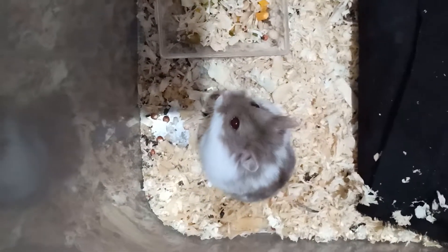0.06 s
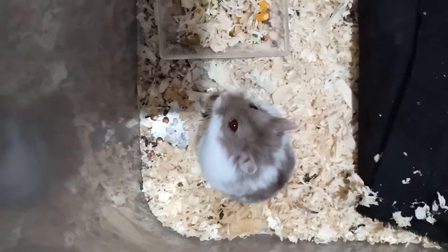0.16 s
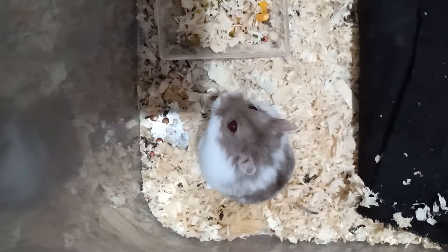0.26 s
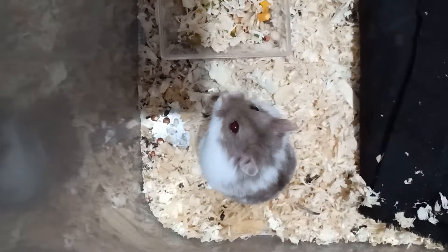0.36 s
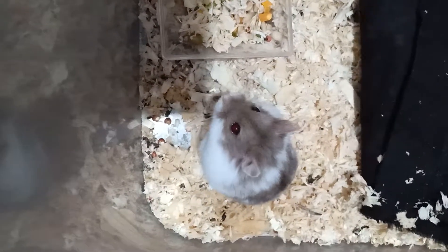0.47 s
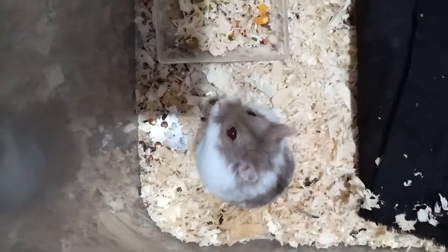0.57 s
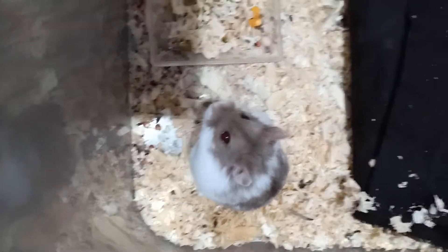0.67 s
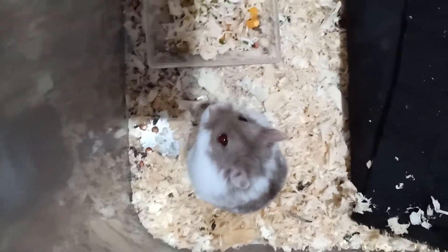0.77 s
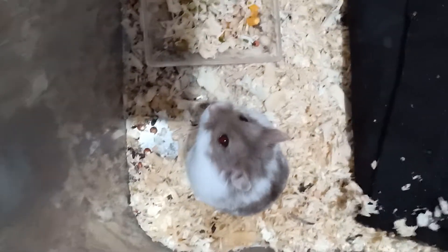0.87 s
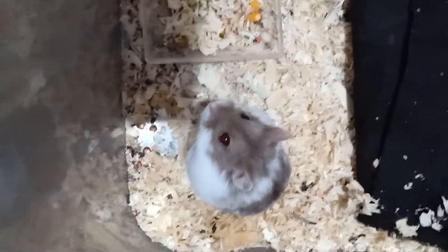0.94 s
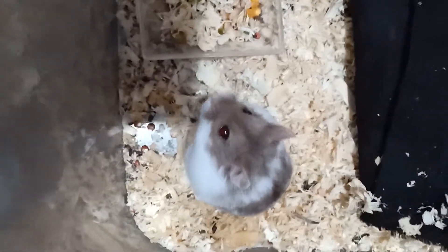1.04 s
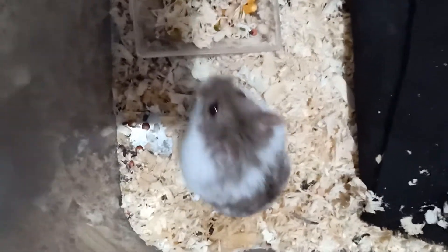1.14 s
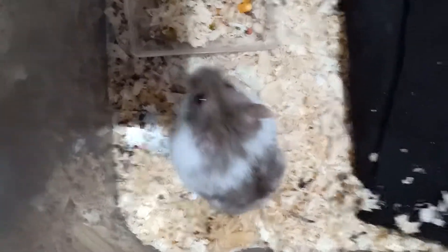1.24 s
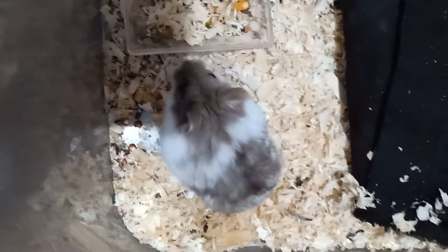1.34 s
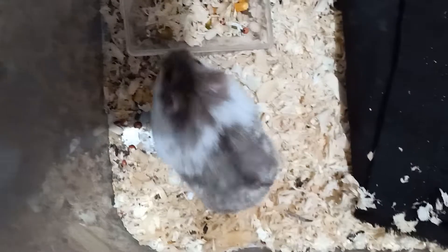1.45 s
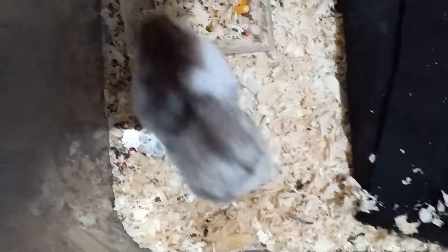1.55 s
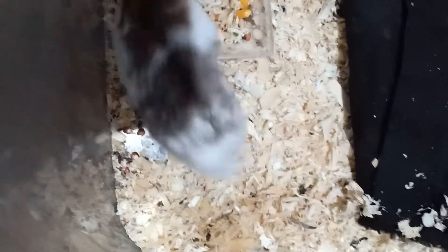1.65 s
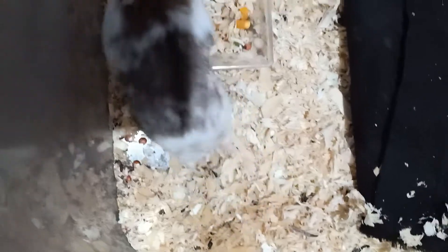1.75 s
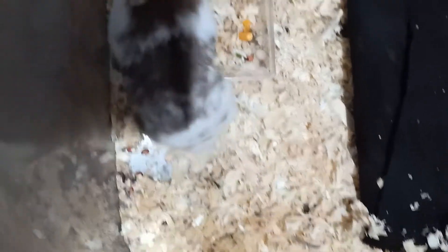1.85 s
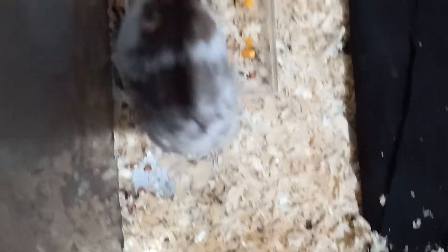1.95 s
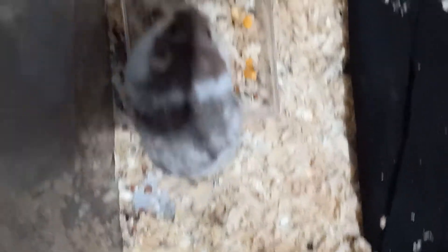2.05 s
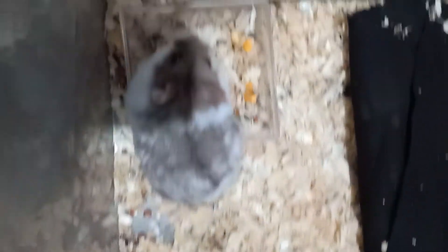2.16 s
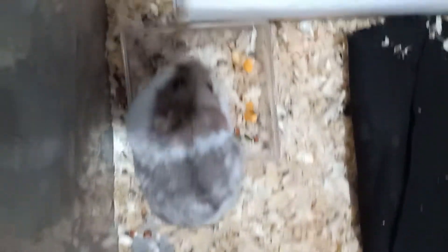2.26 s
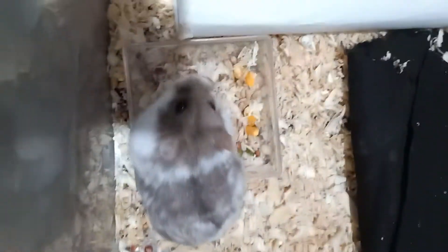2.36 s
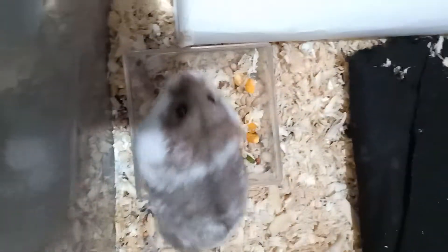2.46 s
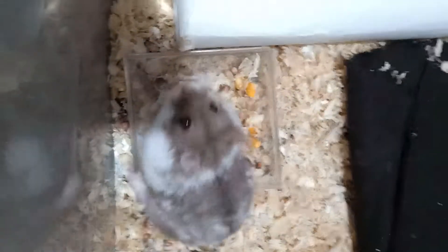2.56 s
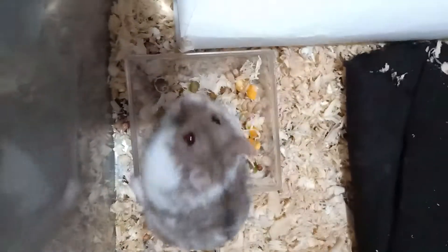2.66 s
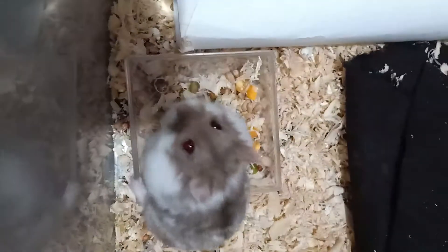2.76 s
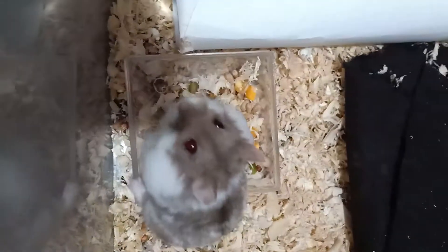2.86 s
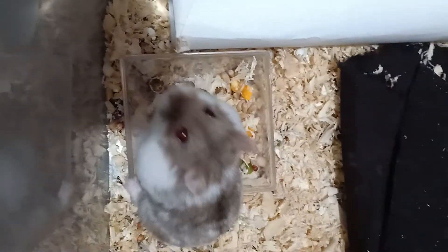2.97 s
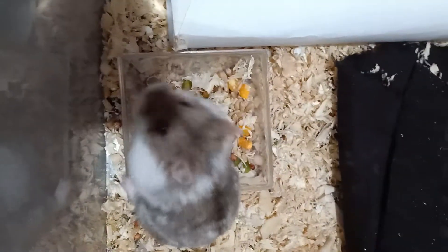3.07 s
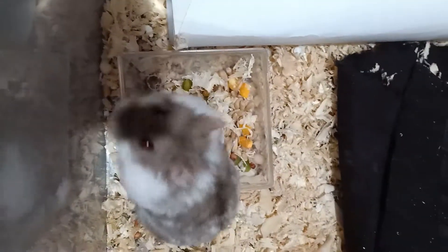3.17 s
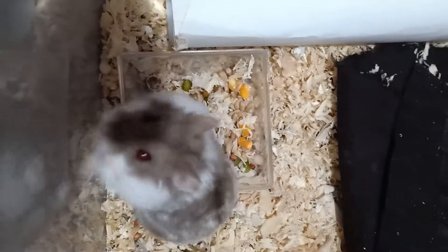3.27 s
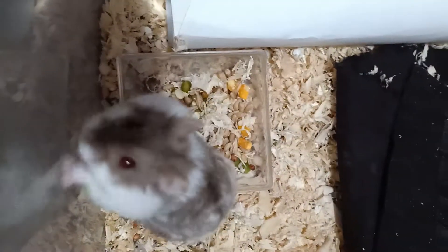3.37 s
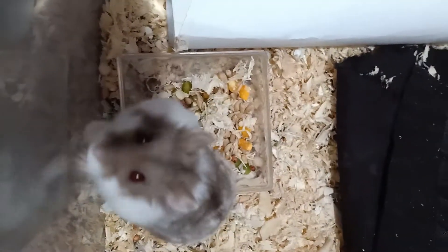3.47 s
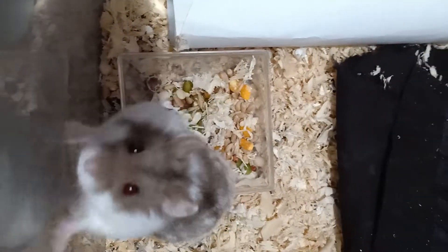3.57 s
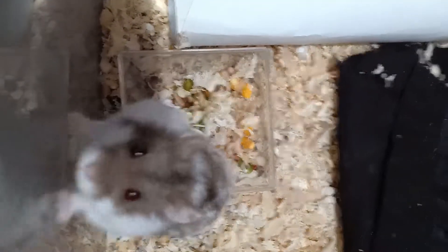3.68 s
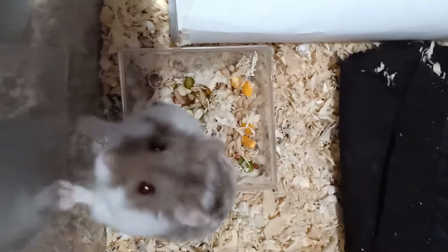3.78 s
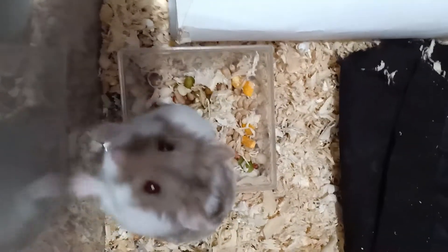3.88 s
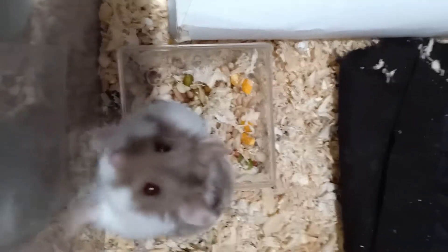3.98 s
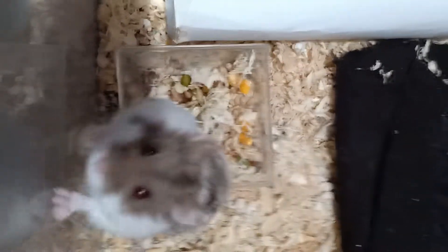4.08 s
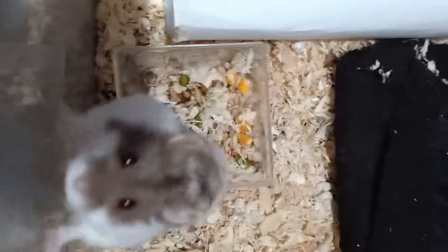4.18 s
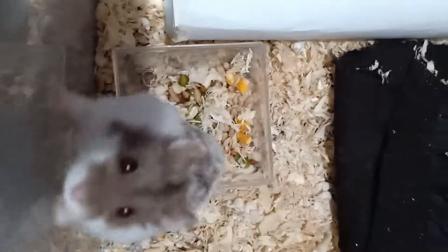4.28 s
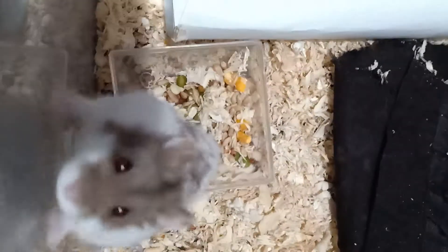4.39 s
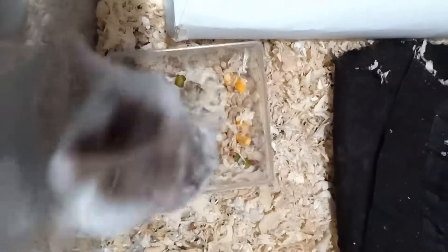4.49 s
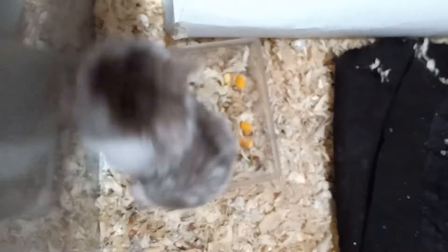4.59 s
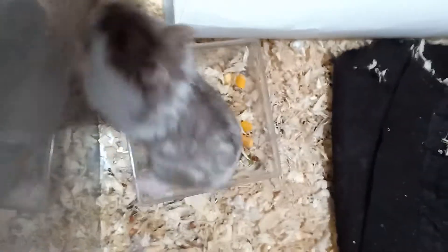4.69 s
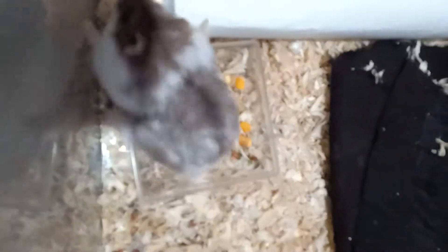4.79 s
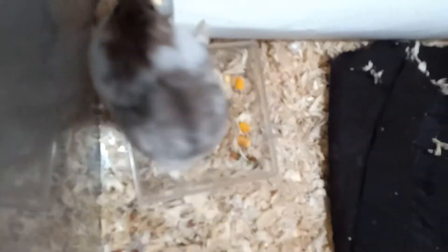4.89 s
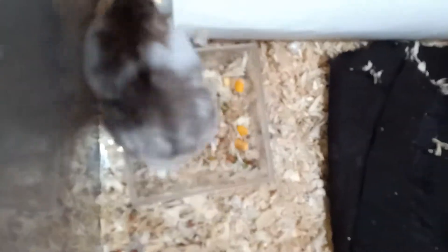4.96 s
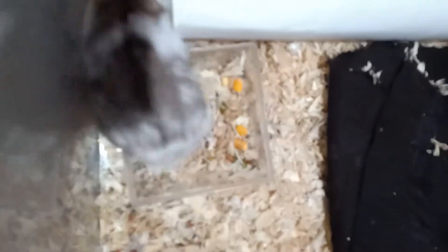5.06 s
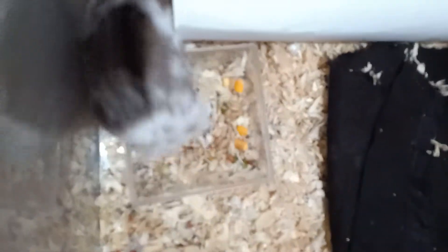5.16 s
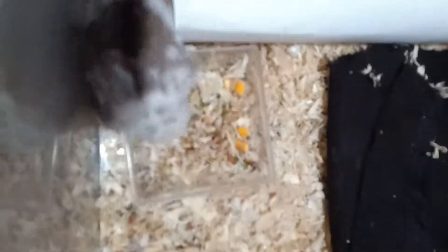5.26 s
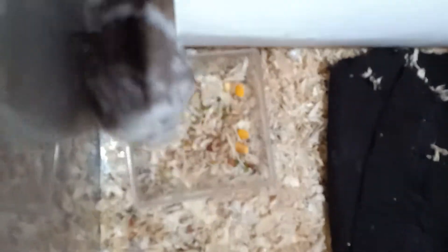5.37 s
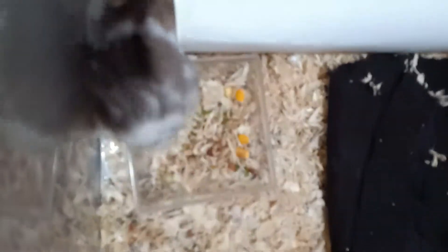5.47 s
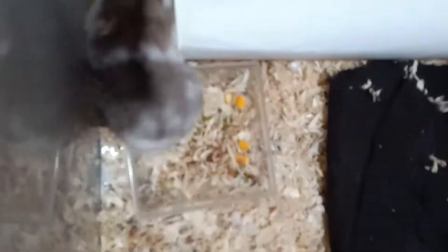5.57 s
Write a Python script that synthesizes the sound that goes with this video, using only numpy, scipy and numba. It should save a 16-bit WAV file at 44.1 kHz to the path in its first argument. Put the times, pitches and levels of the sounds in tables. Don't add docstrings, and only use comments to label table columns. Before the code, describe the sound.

Near silence with faint room hiss, then claws tick thick wood chips and a paw taps the tub wall. Thin shavings snap and rustle in little scattered clusters, with soft pats on a plastic dish and low bumps of shifting weight. Late on, one hard scratchy clack jumps out, then a few smaller rustles and knocks. Close, dry, indoors, leaning right.

```python
import sys
import numpy as np
from scipy import signal
from scipy.io import wavfile
from scipy.ndimage import uniform_filter1d
from numba import njit

SR = 44100
rng = np.random.default_rng(int(sys.argv[2]) if len(sys.argv) > 2 else 0)


def volts(x):
    e = np.asarray(x, float) / 20
    return 10 ** e


def file_out(sig):
    cols = np.atleast_2d(sig).T
    lim = np.clip(cols, -1, 1)
    pcm = np.round(lim * 32767).astype(np.int16)
    wavfile.write(sys.argv[1], SR, pcm)


N = 248283


def level(x, db):
    return x * volts(db) / np.sqrt(np.mean(x ** 2))


def curve(rows):
    s, *columns = np.transpose(rows)
    return [np.interp(np.arange(N) / SR, s, column) for column in columns]


@njit
def svf(x, hz, width):
    y, band, low = np.empty(len(x)), 0., 0.
    g, k = np.tan(np.pi * hz / SR), width / hz
    for i in range(len(x)):
        v = (band + g * (x[i] - low)) / (1 + g * (g + k))
        band, low, y[i] = 2 * v - band, low + 2 * g * v, k * v
    return y


def ring(x, modes, wide=None):
    def body(v):
        out = 0
        for k, (hz, width, db) in enumerate(modes):
            mode = svf(v, 1. * hz, 1. * width)
            if wide:
                mode = svf(mode, 1. * hz, wide * width)
            out = out + (-1) ** k * volts(db) * mode
        return out
    tick = np.zeros(8192)
    tick[0] = 1
    return body(x) / np.sqrt(np.sum(body(tick) ** 2))


def walk(rate_hz):
    hold = int(SR / rate_hz)
    steps = np.repeat(rng.standard_normal(N // hold + 1), hold)
    return 1.488 * uniform_filter1d(uniform_filter1d(steps, hold), hold)[:N]


def bursts(times, dbs, t60s, rise):
    out, t = np.zeros(N + 4096), np.arange(4096) / SR
    for s, db, t60 in np.broadcast(times, dbs, t60s):
        start = int(s * SR)
        out[start:start + 4096] += volts(db - 60 * t / t60) * np.minimum(t / rise + 0.248, 1)
    return out[:N]


def strokes(times, lengths, dbs, sharp):
    out = np.zeros(N)
    for s, length, db in zip(times, lengths, dbs):
        n = int(1.445 * length * SR)
        start = max(int((s + length / 2) * SR) - n // 2, 0)
        out[start:start + n] += volts(db) * np.hanning(n) ** sharp
    return out


def clicks(times, dbs):
    out = np.zeros(N)
    np.add.at(out, (np.asarray(times) * SR).astype(int), volts(np.asarray(dbs)))
    return out


def grit(share, spread_db):
    size = volts(spread_db * rng.exponential(size=N))
    return level(rng.standard_normal(N) * size * (rng.random(N) < share), 0)


def even(x, span_s):
    return x / np.sqrt(uniform_filter1d(x ** 2, int(span_s * SR)) + 1e-9)


def shavings(drive):
    # (centre [Hz], width [Hz], level [dB])
    dull_modes = [(1515, 1240, 0)]
    body_modes = [(2280, 420, 6.5), (2900, 800, -9.5)]
    mid_modes = [(3736.6, 480, 0)]
    crisp_modes = [(5054.4, 970, 5.5), (6003, 2940, -8.0), (8100, 900, -19.5), (4560, 654, 0.5)]
    air_modes = [(9470, 3700, -5.5), (11796, 2680, -5.5), (14650, 2800, 0.5)]
    # (dull [dB], body [dB], mid [dB], crisp [dB], air [dB])
    left_dbs = [-9, -19, -8.5, -12.5, -28.5]
    groups = (dull_modes, body_modes, mid_modes, crisp_modes, air_modes)
    parts = [ring(d, modes, wide=1.835) for d, modes in zip(drive, groups)]
    parts[0] = -parts[0]
    left = sum(volts(db) * part for db, part in zip(left_dbs, parts))
    return np.array([far_port(left, t60=0.0287), sum(parts)])


def far_port(x, t60):
    lag_s, places_per_s, direct = .00036, 5.0, 0.4
    t = np.arange(2048) / SR
    chance = rng.standard_normal(2048)
    turn = 2 * np.pi * places_per_s * np.arange(N) / SR
    out = direct * np.roll(x, int(lag_s * SR))
    for share, scatter in ((np.cos(turn), chance), (np.sin(turn), chance[::-1])):
        path = scatter * volts(-60 * t / t60) * (t > lag_s)
        out = out + signal.fftconvolve(share * x, path / np.sqrt(np.sum(path ** 2)))[:N]
    return out


def snaps():
    t60_s = 0.0149
    s, body_db, mid_db, crisp_db, air_db = np.transpose(breaks())
    crack = np.tanh(1.051 * rng.standard_normal(N))
    dbs = (body_db - 7.0, body_db + 3.5, mid_db + 3.0, crisp_db + 3.5, air_db + 3.5)
    single = [crack * bursts(s, db, share * t60_s, rise=.0007)
              for db, share in zip(dbs, (.9, 1.1, 1.05, .95, .8))]
    return np.add(single, flicks(crack))


def breaks():
    # (time [s], level [dB], thinness [dB], fineness [dB])
    thin_rows = [(0.878, -47.5, -6.5, -22), (1.7339, -44, 7, -17.5), (1.9911, -38.5, 1.5, -20),
                 (2.5428, -43, -10, -17.5), (2.9752, -39, 4, -21.5), (3.1737, -39.5, 2, -13.5),
                 (3.2806, -46.5, -0.5, -19.5), (3.3318, -39.5, -4, -5.5), (3.3422, -41.5, -2, -8),
                 (3.387, -45, -3, -11.5), (3.4203, -44.5, -4.5, -19.5), (3.4284, -49, 3.5, -17),
                 (3.5651, -45.5, 2.5, -14.5), (4.4116, -47, 1.5, -20.5), (4.4837, -42.5, -8, -22),
                 (4.5213, -18, -3, -8), (4.7276, -42, -3.5, -24.5), (4.8421, -40, -2.5, -25.5),
                 (4.8558, -45, -6, -18.5), (4.8907, -42, 0, -16), (5.2571, -50.5, 13.5, -15),
                 (5.2714, -49, 4, -23), (5.3067, -41, -7, -19)]
    # (time [s], level [dB])
    tick_rows = [(0.0601, -59.5), (0.4239, -52.5), (0.856, -49), (1.5299, -43), (1.545, -59.5),
                 (2.4591, -45), (2.558, -48), (2.583, -49.5), (2.7374, -46), (2.8753, -49), (2.9508, -47.5),
                 (3.0177, -53), (3.2299, -54), (4.118, -46.5), (5.0266, -38), (5.21, -37), (5.291, -37.5),
                 (5.353, -46), (5.5544, -51.5)]
    # (time [s], level [dB])
    split_rows = [
        (0.878, -54.5),
        (1.7225, -37),
        (1.7339, -36),
        (2.975, -38),
        (4.5153, -26),
        (4.653, -59.5),
        (4.8425, -44.5),
        (4.891, -48),
        (5.0264, -43),
        (5.2335, -42.5),
    ]
    rows = []
    for s, db, thin_db, fine_db in thin_rows + [(s, db, -16, -12.5) for s, db in tick_rows]:
        crisp_db = db + thin_db
        rows.append((s, db, crisp_db - 11, crisp_db, crisp_db + fine_db))
    return rows + [(s, db - 12.5, db, db - 12.5, db - 21.5) for s, db in split_rows]


def flicks(crack):
    # (time [s], level [dB], thinness [dB], fineness [dB])
    catch_rows = [(4.503, -27.0, -11.5, -21.5), (4.5069, -21.5, -8.5, -18.5), (4.509, -22.0, -4.5, -19.0),
                  (4.5137, -24.5, 4.0, -19.0), (4.5165, -18.5, -1.5, -20.5), (4.5232, -12.0, -2.0, -14.0),
                  (4.529, -15.0, -17.0, -6.5), (4.5345, -19.5, -3.0, -12.0), (4.5371, -21.0, -6.0, -9.5),
                  (4.5414, -25.0, -2.0, -7.5), (4.544, -24.0, 3.5, -14.5), (4.5494, -33.5, 3.5, -13.0),
                  (4.553, -24.5, -2.5, -19.5), (4.5609, -26.5, 2.0, -16.0), (4.5674, -39.0, -1.0, -17.0),
                  (4.5705, -37.5, -2.0, -21.0), (4.5742, -37.5, -7.0, -17.5), (4.5214, -16, -8, -14),
                  (4.5563, -30, 2, -14), (4.5585, -27, -3, -14), (4.5632, -29, -2, -14)]
    # (time [s], level [dB], thinness [dB], fineness [dB])
    flick_rows = [(1.6567, -47.0, -7.5, -17.5), (1.6628, -44.5, -2.0, -24.5), (1.6689, -48.0, -6.0, -20.0),
                  (1.6734, -46.5, -7.0, -17.5), (1.6774, -48.0, -6.5, -18.5), (1.6824, -54.5, -3.0, -16.0),
                  (1.706, -51.0, -4.5, -12.5), (1.709, -58.0, 2.0, -17.0), (1.7128, -55.0, -1.0, -8.5),
                  (1.7155, -53.0, 5.0, -16.0), (1.7199, -47.5, 1.5, -9.5), (1.7225, -43.5, 10.0, -17.0),
                  (1.7258, -40.5, 2.0, -13.5), (1.7304, -38.0, -1.5, -9.0), (1.735, -40.0, 10.0, -19.0),
                  (1.7424, -56.0, 5.5, -15.0), (1.748, -55.0, 4.5, -18.0), (1.7503, -60.5, 6.5, -10.0),
                  (1.7525, -61.5, 2.5, -11.5), (4.6337, -42.0, -9.0, -24.5), (4.6376, -42.0, -8.0, -25.5),
                  (5.2097, -42.0, -16.5, -14.5), (5.215, -34.0, -1.0, -41.5), (5.2208, -45.0, -4.5, -29.0),
                  (5.2235, -45.0, 0.0, -30.5), (5.2307, -42.5, 1.5, -30.5), (5.2353, -44.5, 2.0, -16.0),
                  (5.2409, -52.0, 2.0, -30.5), (2.0051, -56.5, 14.5, -23.0), (2.01, -48.5, 1.0, -19.0),
                  (2.021, -51.0, 0.5, -18.5), (1.8796, -51.0, -8.0, -8.5), (1.8834, -47.0, -8.0, -13.5),
                  (1.8891, -53.0, 2.0, -19.0), (1.8941, -42.0, -4.5, -25.5), (0.7685, -53, -1, -25),
                  (0.786, -54, 1, -25), (1.0745, -56, 4, -25), (1.8945, -46, -2, -22),
                  (1.9915, -45, 2, -16), (2.9762, -36, 1, -20), (4.7282, -47, -5, -25),
                  (4.8912, -35, -9, -20), (5.2152, -38, -2, -35)]
    # (time [s], level [dB])
    clack_rows = [(0.768, -56), (0.8575, -50), (1.122, -48), (1.126, -50), (2.459, -52), (2.976, -47),
                  (3.058, -58), (3.174, -46), (3.281, -53), (3.333, -49), (3.421, -55), (3.429, -54),
                  (3.566, -52), (4.249, -46), (4.263, -52), (4.787, -52), (4.891, -46), (5.027, -43),
                  (5.208, -53)]
    # (dull [dB], body [dB], mid [dB], crisp [dB], air [dB])
    gain_dbs = (-3.5, 12.0, 1.5, 10.0, 11.0)
    tail_db, tail_t60_s, clack_gain_db = -12.0, 0.006, 13.5
    s, db, thin_db, fine_db = np.transpose(catch_rows + flick_rows)
    crisp_db = db + thin_db
    out = []
    for group_db, gain_db in zip((db, db, crisp_db, crisp_db, crisp_db + fine_db), gain_dbs):
        push_db = group_db + gain_db
        tail = crack * bursts(s, push_db + tail_db, tail_t60_s, rise=.0004)
        out.append(clicks(s, push_db) + tail)
    s, db = np.transpose(clack_rows)
    out[0] = out[0] + clicks(s, db + clack_gain_db)
    return out


def rustle():
    # (time [s], effort [dB])
    stir_rows = [(0.0, -80.5), (0.69, -86), (1.35, -75.5), (1.86, -66.5), (2.04, -67), (2.19, -77),
                 (2.43, -72.5), (2.59, -68.5), (2.98, -85.5), (3.31, -74), (4.09, -77), (4.33, -73),
                 (4.45, -62), (4.59, -57.5), (4.67, -67.5), (5.08, -64.5), (5.36, -75), (5.63, -68.5)]
    # (time [s], level [dB], speed [0-1])
    scrape_rows = [
        (4.497, -61, .2),
        (4.503, -32, .1),
        (4.508, -26.5, .4),
        (4.519, -23, 0.44),
        (4.529, -24.5, 0.74),
        (4.546, -31.5, 0.84),
        (4.563, -33, 0.72),
        (4.569, -45.5, 0.5),
        (4.62, -62.5, 0.08),
    ]
    body_db, = curve(stir_rows)
    crisp_db = -75 + 0.717 * (body_db + 72)
    patch = even(volts(3.08 * walk(60)) * grit(share=.3, spread_db=2.0), 0.106)

    s, length, scratch_body_db, scratch_crisp_db, scratch_air_db = np.transpose(scratches())
    catch = even(volts(3.0 * walk(280)) * grit(share=.4, spread_db=2.2), 0.0112)

    db, speed = curve(scrape_rows)
    hard_crisp_db = -9 + 9 * speed
    hard_air_db = -29.5 + 25.5 * speed
    moving = (db > db[0]) * (db != db[-1])
    drag = volts(db - 3.5) * moving * even(volts(2.6 * walk(400)) * grit(share=0.79, spread_db=2.5), .008)

    soft = (body_db - 8, body_db + 1.5, crisp_db - 5, crisp_db + 1.5, crisp_db - 18)
    scratch = (scratch_body_db - 4, scratch_body_db, scratch_crisp_db - 7.5, scratch_crisp_db, scratch_air_db)
    hard = (-19, 0, hard_crisp_db - 9.0, hard_crisp_db, hard_air_db)
    return [volts(soft_db) * patch + strokes(s, length, scratch_db - 2.5, sharp=0.38) * catch + volts(hard_db) * drag
            for soft_db, scratch_db, hard_db in zip(soft, scratch, hard)]


def scratches():
    # (time [s], length [s], level [dB], thinness [dB])
    scratch_rows = [(0.768, 0.00574, -54, 0.48), (0.777, 0.023, -58, -.4), (0.856, 0.0169, -58.5, -7.5),
                    (1.071, 0.0097, -58, 3.5), (1.12, 0.01254, -50, -1), (1.656, 0.0269, -52.5, -6.5),
                    (1.695, 0.0336, -56.5, 1), (1.719, 0.0196, -50, 2), (1.744, 0.034, -75.5, 18.5),
                    (1.879, 0.0217, -58.5, -3.5), (2.0, 0.036, -54.5, 0.5), (2.481, 0.066, -57, -8),
                    (2.5, 0.0156, -60, -7.5), (2.938, 0.0372, -55, -3), (2.982, 0.0228, -68, 9),
                    (3.053, 0.0102, -63, 2.5), (3.274, 0.043, -61, -10.5), (3.332, 0.0138, -51, 1),
                    (3.342, 0.0312, -51.5, -4), (3.425, 0.0184, -58, -6), (4.48, 0.026, -48, -7.5),
                    (4.632, 0.00904, -49, -7.5), (4.678, 0.0128, -52, -8.5), (4.755, 0.0472, -55, -4),
                    (4.851, 0.0554, -53.5, -0.5), (4.8905, 0.0035, -39, -15), (5.03, 0.0141, -53.5, 3.5),
                    (5.188, 0.0169, -52, -8.5), (5.213, 0.0321, -54, -0.5), (5.283, 0.0467, -58.5, -3.5)]
    # (time [s], length [s], level [dB])
    slide_rows = [(0.511, 0.041, -65), (1.056, 0.048, -67), (1.583, 0.023, -67.5), (1.833, 0.033, -67.5),
                  (2.711, 0.034, -62.5), (3.01, 0.0214, -64.5), (3.153, 0.0406, -62.5),
                  (3.503, 0.128, -70.5), (4.085, 0.0177, -63), (4.113, 0.022, -67.5), (4.24, 0.027, -61.5),
                  (4.405, 0.0305, -60), (4.448, 0.0236, -58.5), (5.06, 0.0756, -59.5),
                  (5.25, 0.0356, -63.5), (5.329, 0.036, -63)]
    # (time [s], length [s], level [dB])
    dust_rows = [(0, 0.0211, -63.5), (0.084, 0.0152, -65), (1.12, 0.0124, -75), (1.695, 0.033, -71.5),
                 (1.719, 0.0217, -57), (1.922, 0.0165, -65), (2.421, 0.0093, -63), (2.451, 0.015, -57),
                 (2.481, 0.057, -66), (2.497, 0.0155, -62), (2.628, 0.0133, -70), (3.331, 0.0157, -61),
                 (4.677, 0.0125, -68), (4.755, 0.049, -72), (5.029, 0.013, -70), (5.061, 0.073, -74.5)]
    coarse = scratch_rows + [(*row, -3) for row in slide_rows]
    rows = [(s, length, db, db + thin_db, db + thin_db - 22.5) for s, length, db, thin_db in coarse]
    return rows + [(s, length, db - 11.5, db - 1.5, db) for s, length, db in dust_rows]


def tub():
    # (centre [Hz], width [Hz], level [dB])
    groups = [
        [(148, 27, 1.5), (200, 60, 3.5), (265.8, 63, 3), (509, 63.4, -1.5)],
        [(333.7, 46.5, 5), (385, 57.5, -1.5)],
        [(618, 57, 2.5), (745, 88, -12.5)],
        [(780, 190, 3), (1070.5, 174, 3), (1500, 300, -5.5)],
    ]
    # (deep [dB], low [dB], hollow [dB], upper [dB])
    left_dbs = [-4.5, -9.5, -11.5, -9]
    # (time [s], weight [dB])
    weight_rows = [(0.0, -78), (0.66, -82.5), (0.72, -72.5), (1.32, -74.5), (1.73, -57), (1.85, -64),
                   (2.1, -64), (2.62, -76), (2.7, -73), (3.29, -63.5), (3.62, -70), (3.72, -57.5),
                   (4.0, -79.5), (4.34, -69), (4.59, -45.5), (4.74, -61), (5.1, -61), (5.5, -78.5)]
    gain_dbs, shuffle_dbs = (19.12, 19.44, 20.43, 15.67), (-12.0, -6.5, -5.5, -7)
    shelf_hz = 73.1
    s, *dbs, soft = np.transpose(knocks())
    boom_db, (weight_db,) = leans(), curve(weight_rows)
    shuffle = volts(weight_db) * even(volts(4.0 * walk(60)) * grit(share=.1, spread_db=2.5), .06)
    skid = volts(-30) * rng.standard_normal(N)
    out = 0
    for db, modes, gain_db, shuffle_db, left_db in zip(dbs, groups, gain_dbs, shuffle_dbs, left_dbs):
        hard_db, soft_db = db + gain_db + 20 * np.log10([1 - soft, soft])
        push = bursts(s, db + gain_db, 0.0647, rise=0.00084) * skid
        push -= bursts(s, hard_db - 18.5, 0.00296, rise=0.000263)
        wall = ring(push + volts(shuffle_db) * shuffle, modes)
        wall -= ring(bursts(s, soft_db - 11.5, 0.0023, rise=0.000275), modes, wide=1.244)
        out = out + np.array([-volts(left_db) * np.roll(wall, 4), wall])
    hum = np.sin(2 * np.pi * np.cumsum(shelf_hz * (1 + 0.05 * walk(9))) / SR)
    rattle = even(ring(rng.standard_normal(N), [(121, 90, 0)], wide=2), .06)
    boom = volts(boom_db + 8.5 + 1.5 * walk(15)) * (hum + volts(-8.0) * rattle)
    return out + np.array([-volts(-9) * boom, boom])


def knocks():
    # (time [s], level [dB], low group shift [dB])
    pat_rows = [(1.531, -53, -7), (1.565, -52, -16), (1.588, -48, -16), (1.667, -43, -10),
                (1.706, -48, -10), (1.762, -56, 10.5), (2.078, -52.5, 0), (3.175, -41, -1),
                (3.283, -47.5, 1), (3.301, -70.5, 14), (3.43, -47.5, -3), (3.566, -44, -3),
                (4.355, -51.5, -4), (4.39, -48.5, -1), (4.444, -46.5, -10), (4.64, -65.5, 14.5),
                (4.945, -50.5, -0.5), (4.965, -51, -5.5), (5.02, -44.5, -6.5)]
    # (time [s], level [dB], hollow group shift [dB])
    rap_rows = [(1.1785, -33.5, -10), (1.223, -51.5, -3), (2.062, -36, -9), (3.33, -44.5, -23.5),
                (4.249, -32.5, -20.5), (4.262, -38.5, -24.5), (4.42, -36.5, -7.5), (4.5285, -19.5, 1),
                (4.535, -30, 1.5), (4.571, -40, -3), (4.59, -43, -15), (4.603, -41, -15), (4.612, -45, -3),
                (4.43, -44, -6), (4.478, -43, -15), (4.767, -46, -12), (4.776, -47, -9), (4.79, -46, -12),
                (4.682, -48, -3), (5.136, -49, -5), (1.66, -48, -6), (2.458, -47, -6), (2.077, -46, -6),
                (5.021, -48, -6)]
    # (time [s], level [dB], deep group shift [dB])
    thud_rows = [(1.667, -59, 8.5), (1.724, -37.5, -13), (2.54, -44.5, -15), (4.242, -49, 0),
                 (4.444, -58, 17), (4.455, -52, 4), (4.5285, -25, -7.5), (4.68, -52.5, -14),
                 (5.027, -35.5, -5.5), (5.136, -50, 8.5), (5.148, -52, 5), (5.165, -55, 12.5),
                 (5.185, -60.5, 10.5), (5.274, -52, 8), (5.307, -54, 8.5)]
    # rows, group shifted, (deep, low, hollow, upper) dB, softness 0-1
    kinds = ((pat_rows, 1, (-23, 0, 0, -8), 0.67),
             (rap_rows, 2, (-23.5, -19.5, 0, 0), 0.16),
             (thud_rows, 0, (0, -1.2, -0.64, 0.22), 0.18))
    out = []
    for rows, group, share_db, soft in kinds:
        for s, db, place_db in rows:
            group_db = db + np.array(share_db)
            group_db[group] += place_db
            out.append((s, *group_db, soft))
    return out


def leans():
    # (time [s], level [dB], time to rise or fall 20 dB [s])
    lean_rows = [(0.0, -79, 0.1), (1.22, -61.5, 0.08), (1.73, -61, 0.09), (2.05, -68, 0.01),
                 (2.52, -70, 0.33), (3.04, -78.5, .3), (3.36, -67.5, 0.01), (3.62, -72, 0.3),
                 (4.04, -67, 0.11), (4.2, -65, 0.26), (4.47, -65, 0.42), (4.59, -60, 0.11),
                 (5.2, -60.5, 0.04), (5.31, -71.5, 0.27)]
    rest_db = -85.5
    s, db, span_s = np.transpose(lean_rows)[:, :, None]
    swell_db = db - 20 * np.abs(np.arange(N) / SR - s) / span_s
    return np.maximum(np.max(swell_db, axis=0), rest_db)


def room():
    # (frequency [Hz], density [dB per Hz])
    spectrum = [(26, -33), (45, 0), (53, -14), (85, -0.5), (201, -3), (429, -10), (619, -7), (1320, -16),
                (2160, -10.5), (2900, -15.5), (3440, -28.5), (5210, -22), (7910, -35), (13600, -28),
                (15700, -31)]
    out, swell = 0, walk(0.43)
    hz_at, db_at = np.transpose(spectrum)
    for hz in 15600 / 2 ** np.arange(0, 9.4, 1 / 4):
        mid, side = (svf(svf(rng.standard_normal(N), hz, hz / 3), hz, hz / 3) for _ in range(2))
        db = np.interp(np.log(hz), np.log(hz_at), db_at) + .4 * swell + 1.4 * walk(9)
        side_share = min(0.23 + hz / 646.0, 1)
        out = out + volts(db) * (mid + side_share * side * np.array([[1], [-1]]))
    return level(out, -64)


def scene():
    return shavings(np.add(snaps(), rustle())) + tub() + room()


def top_cut(x):
    return signal.sosfilt(signal.butter(12, 16290, fs=SR, output="sos"), x)


def record(dry):
    top_hz, offset = 15700, .0008
    mix = signal.sosfilt(signal.butter(1, 22, "high", fs=SR, output="sos"), dry)
    mix = signal.sosfilt(signal.ellip(8, .2, 60, top_hz, fs=SR, output="sos"), mix)
    return top_cut(mix + offset)


dry = scene()
out = record(dry)
file_out(out)
```